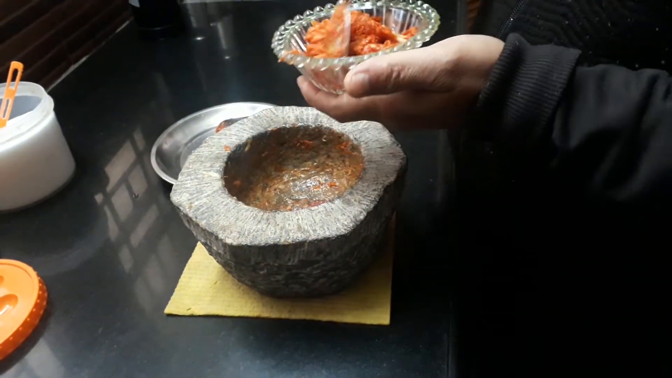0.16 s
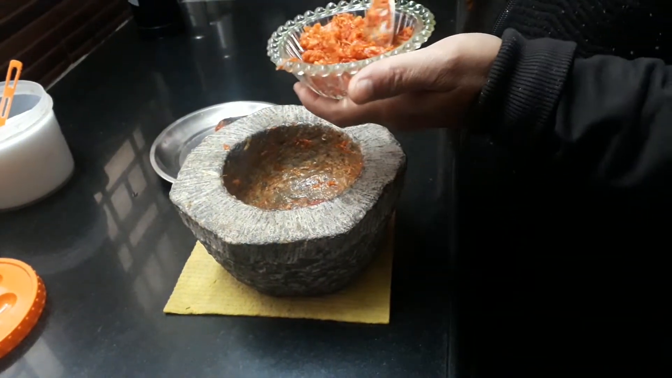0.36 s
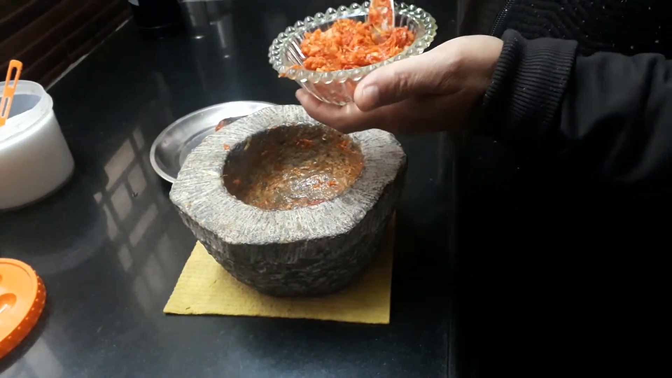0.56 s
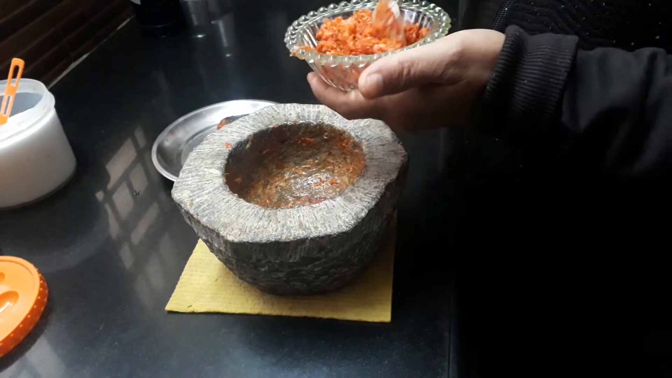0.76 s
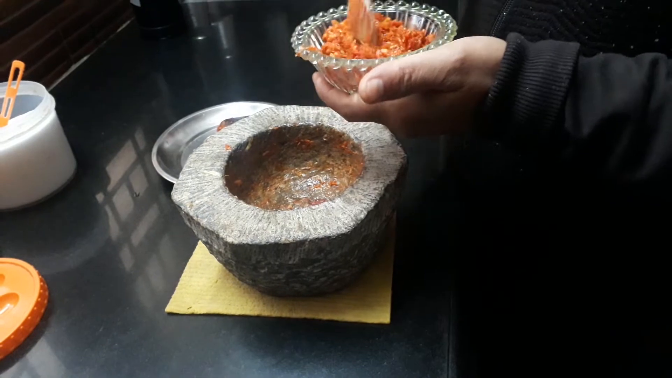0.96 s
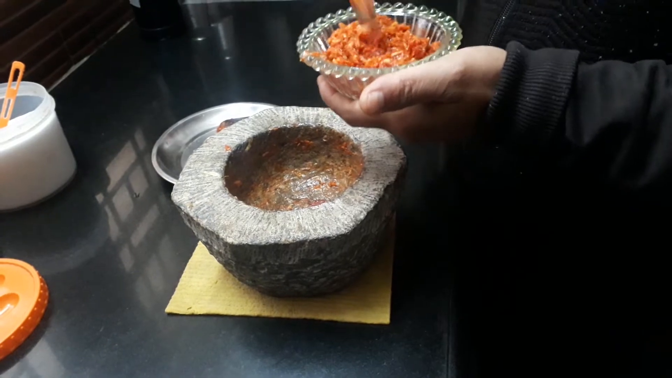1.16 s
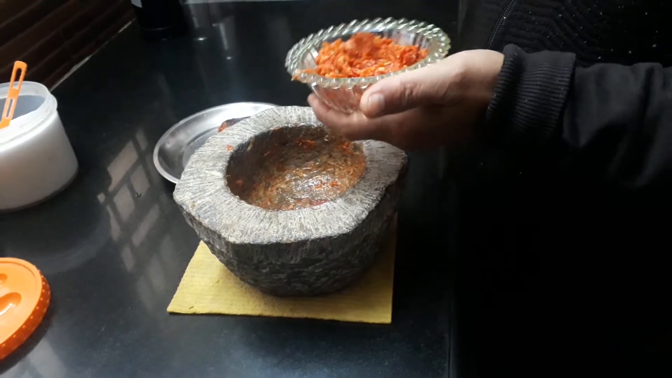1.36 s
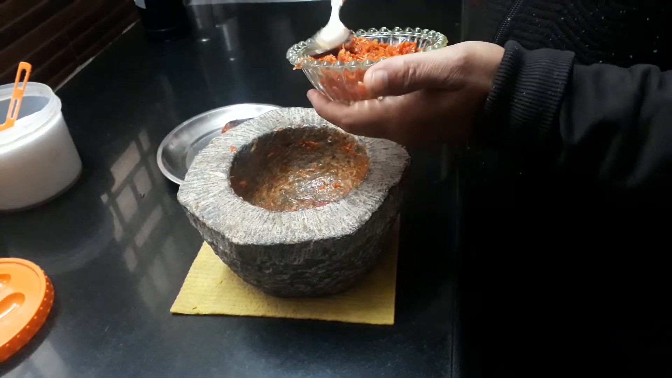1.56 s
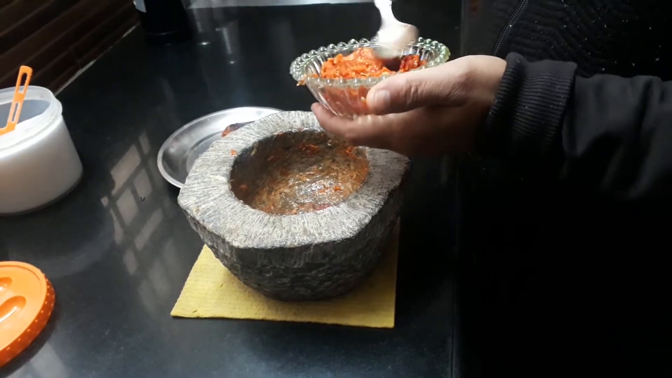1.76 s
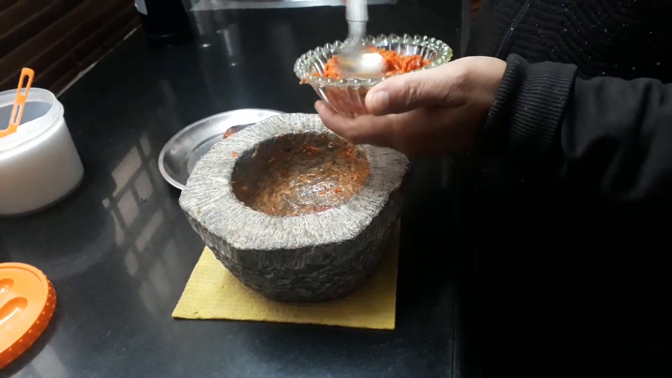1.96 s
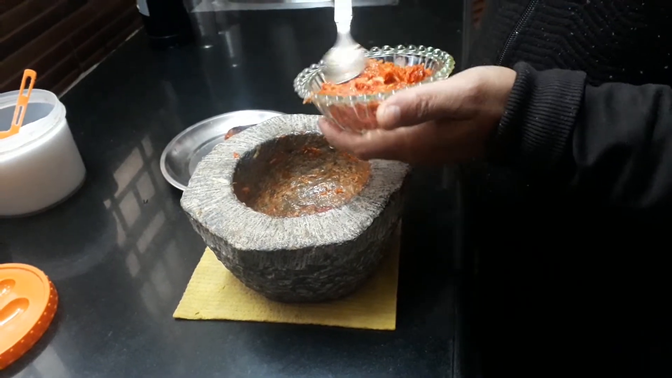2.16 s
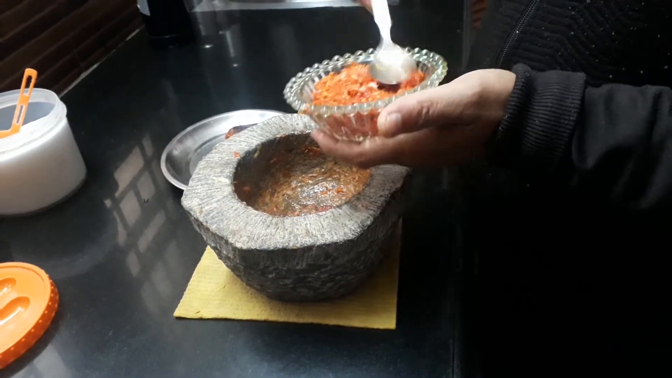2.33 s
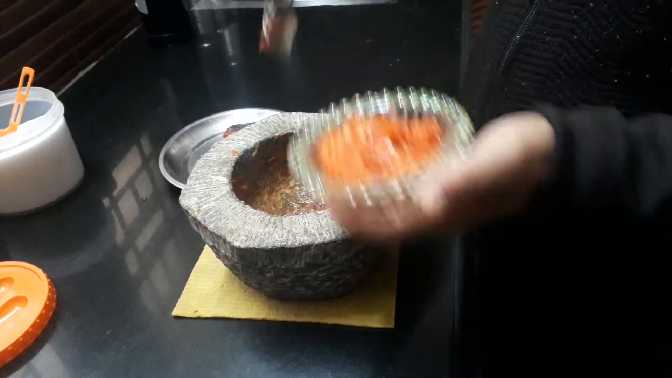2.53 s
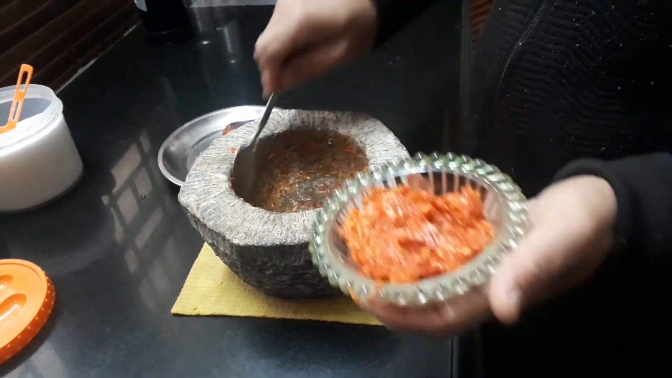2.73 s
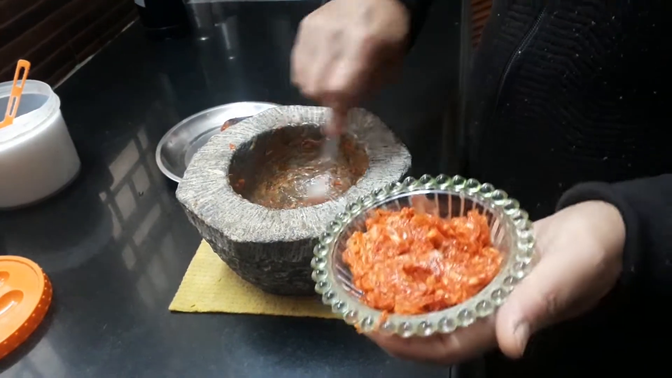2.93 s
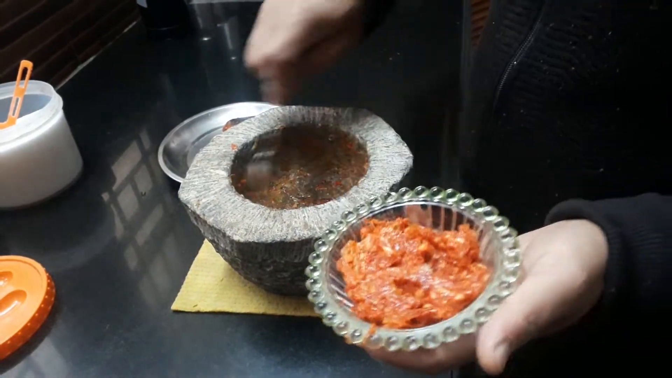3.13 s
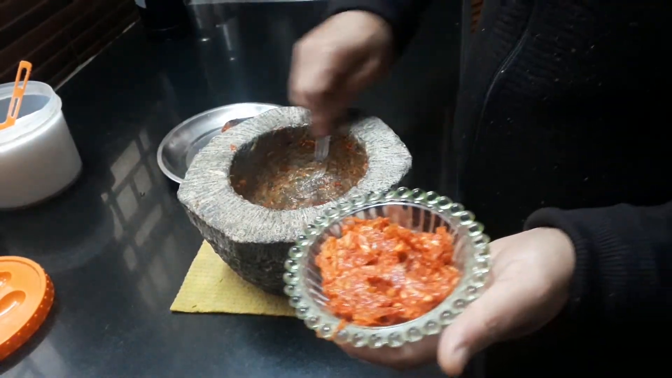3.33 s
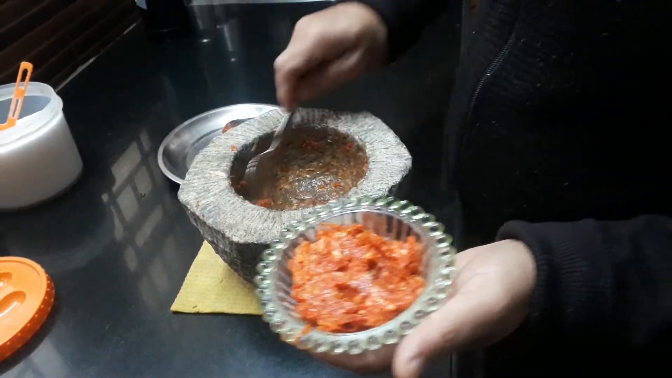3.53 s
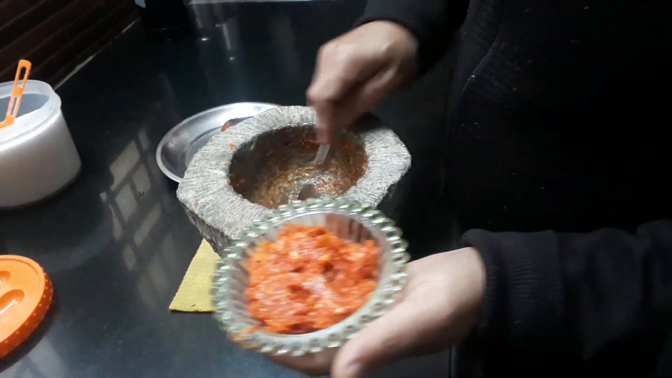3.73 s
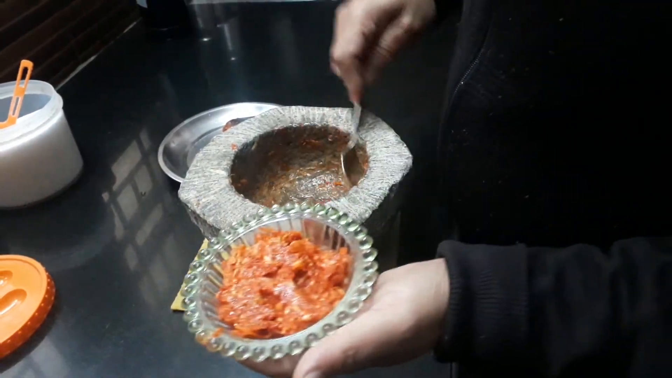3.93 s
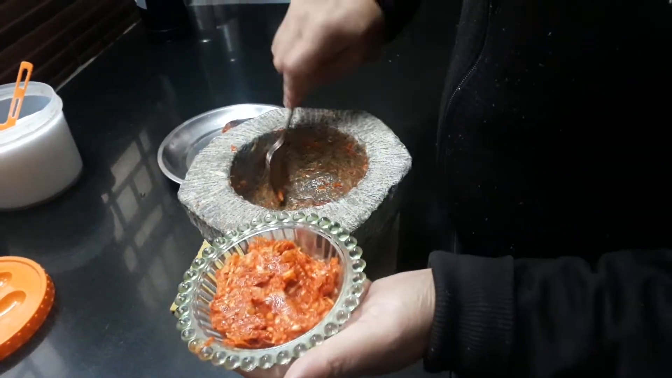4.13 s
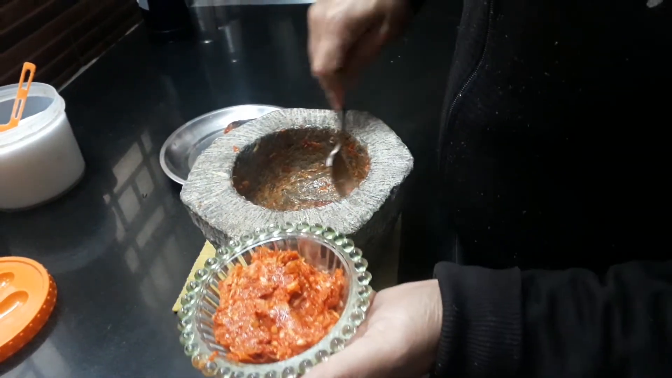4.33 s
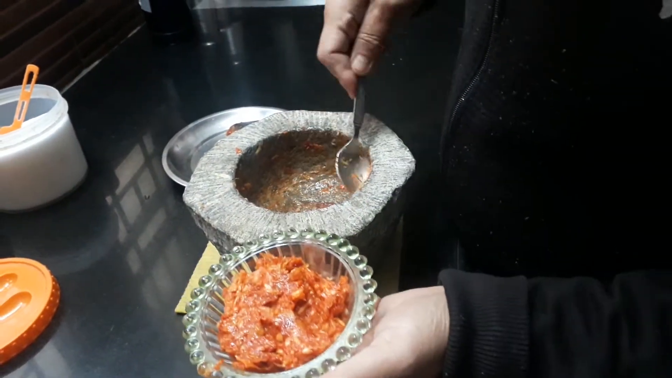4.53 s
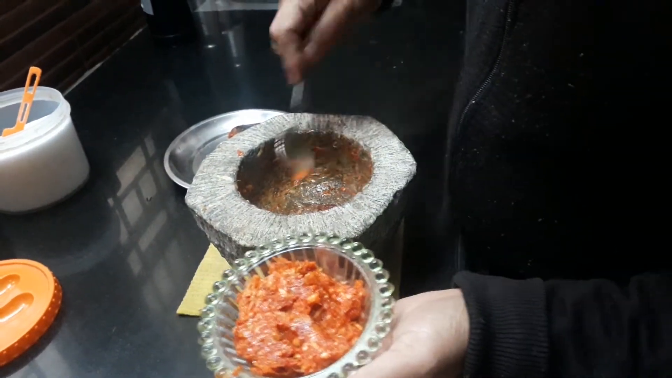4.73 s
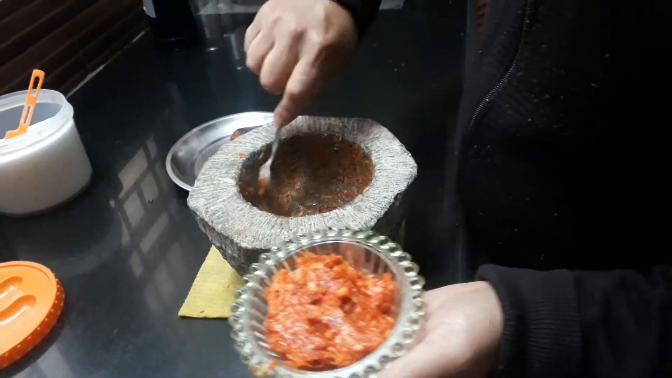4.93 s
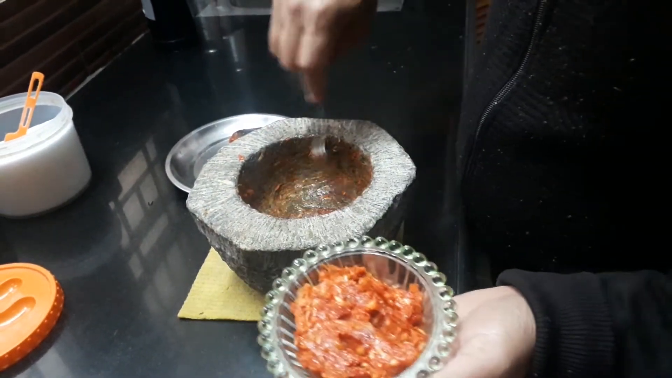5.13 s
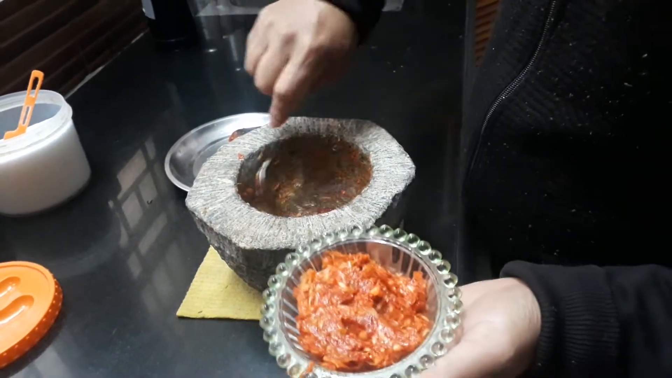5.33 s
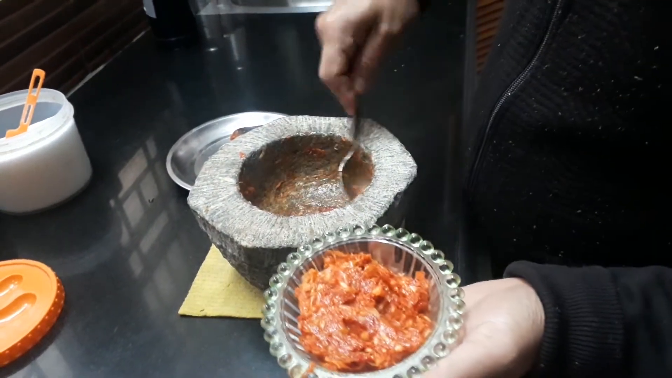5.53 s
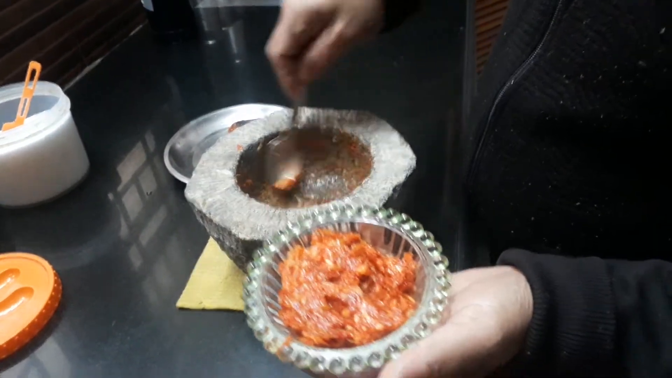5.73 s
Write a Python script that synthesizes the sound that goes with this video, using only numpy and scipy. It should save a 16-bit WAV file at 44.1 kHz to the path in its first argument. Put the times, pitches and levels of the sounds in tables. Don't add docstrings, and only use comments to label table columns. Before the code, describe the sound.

A steel spoon clinks on a hand-held glass bowl, then scrapes and knocks around a rough stone mortar while a pot simmers and hisses behind.

```python
import sys
import numpy as np
from scipy import signal
from scipy.fft import rfft, irfft
from scipy.io import wavfile
from scipy.ndimage import uniform_filter1d, map_coordinates

SR = 44100
rng = np.random.default_rng(int(sys.argv[2]) if len(sys.argv) > 2 else 0)


def amplitude_ratio(level_db):
    exponent = np.asarray(level_db, float) / 20
    return 10 ** exponent


def wav_record(signal):
    frames = np.transpose(np.atleast_2d(signal))
    bounded = np.clip(frames, -1, 1)
    quanta = np.round(bounded * 32767).astype(np.int16)
    wavfile.write(sys.argv[1], SR, quanta)


N = 259308

# (time [s], peak level [dB], colour [Hz], top level [dB])
CATCHES = [(2.7982, -20.5, 5440, -11), (2.8384, -20, 4570, -11), (2.867, -24, 4040, -14),
           (2.9095, -34, 4410, -7), (2.9172, -13, 4660, -11.5), (2.9263, -17, 4680, -15),
           (2.9574, -14.5, 4180, -27), (2.9606, -11, 4000, -33), (3.0187, -31, 4160, -27),
           (3.2065, -13, 6000, -7.5), (3.242, -26, 4600, -11), (3.3179, -13, 7440, -13),
           (3.327, -17.5, 4150, -13), (3.3445, -14.5, 3880, -11), (3.384, -22.5, 2940, -18),
           (3.4443, -18.5, 4340, -23), (3.5923, -12.5, 5900, -3.5), (3.6683, -23, 4150, -16),
           (3.6783, -19, 4160, -23), (3.69, -29, 7160, -1), (3.7037, -21, 4110, -18),
           (3.7361, -22, 3550, -13), (3.7496, -14, 4100, -12), (3.7547, -17, 5440, -11),
           (3.7831, -12, 2540, -23), (3.8066, -4.5, 3500, -19), (3.8148, -16, 3230, -19),
           (3.8272, -16, 3700, -26), (3.8333, -6.5, 3800, -31), (3.8496, -23, 3360, -25),
           (3.8597, -8, 3960, -19), (3.8681, -7, 4100, -26), (3.8817, -14, 3300, -29),
           (3.9173, -21, 4100, -12), (3.9346, -18, 4080, -6), (3.9556, -23, 4100, -13),
           (4.1122, -15.5, 5650, -11.5), (4.1837, -27, 4730, -11), (4.2475, -20, 3640, -15),
           (4.2518, -22.5, 5100, -15), (4.2788, -21, 3760, -20), (4.2994, -13.5, 4270, -27),
           (4.3302, -10, 4400, -11), (4.3611, -10, 3000, -29), (4.3855, -2.5, 4150, -20),
           (4.3933, -11, 4180, -23), (4.4035, -24, 3240, -28), (4.4209, -7, 4700, -27),
           (4.4244, -0.5, 4200, -19), (4.4392, -20, 3990, -28), (4.4665, -18, 3900, -18),
           (4.4872, -24, 4050, -25), (4.5054, -10, 4180, -21), (4.5082, -11, 5300, -15),
           (4.5256, -18, 4000, -27), (4.5831, -10, 4710, -17), (4.6027, -10, 5230, -16.5),
           (4.609, -22, 3260, -21), (4.8686, -8.5, 5970, -0.5), (4.95, -24, 3590, -12),
           (4.9762, -19, 4350, -16), (4.982, -28, 3260, -20), (5.0064, -14, 3380, -19),
           (5.042, -14, 4270, -18), (5.0662, -9.5, 3420, -24), (5.0698, -4.5, 4320, -32),
           (5.0857, -15, 4190, -32), (5.089, -8, 3730, -33), (5.0916, -6, 4950, -18.5),
           (5.0947, -19, 3320, -24), (5.1044, -23, 3460, -22), (5.107, -24, 3880, -29),
           (5.3004, -11.5, 6000, -3.5), (5.3307, -17.5, 4500, -21), (5.383, -22, 4870, -25),
           (5.425, -20.5, 4150, -10), (5.4496, -14.5, 5010, -17), (5.473, -13, 4200, -13),
           (5.4943, -14, 3470, -12), (5.501, -8.5, 3500, -17), (5.5056, -10.5, 3970, -25),
           (5.51, -14, 3180, -26), (5.5212, -12, 3330, -27), (5.5534, -8.5, 4900, -22),
           (5.5622, -10, 3360, -26), (5.5738, -12, 3770, -28), (5.5895, -8.5, 4670, -11),
           (5.599, -13, 4340, -22), (5.606, -12, 4500, -23), (5.615, -8.5, 4900, -14),
           (5.621, -5, 2920, -16), (5.781, -16, 4300, 3), (5.867, -36, 4030, -13)]
# (time [s], pressure [dB], low stone [dB], edge brightness [dB], hollow [dB])
STROKES = [(2.77, -54, -5, -10, -5), (2.79, -48, -13, 7, -21), (2.99, -42.5, 14.5, 5, 3.5),
           (3.18, -69, -10, -6, -18), (3.22, -45, 1, 11, -5), (3.28, -46.5, -1, 2, -9),
           (3.36, -49, 14, 12, 3), (3.57, -48, -8, -16, -25), (3.59, -57.5, -16, 10, 6),
           (3.62, -52.5, -5, 10.5, -1), (3.83, -34.5, 12.5, 5, -15.5), (4.1, -58.5, -10, -23, 0),
           (4.11, -52, -4, 4, -1), (4.22, -45, -1, -9, -16), (4.29, -41, 7.5, 8, -6),
           (4.47, -32.5, 2, -2, -12.5), (4.63, -46.5, 7, -5, 4), (4.86, -66, -10, -10, -19),
           (4.87, -53.5, 12, 3, 3), (4.95, -42.5, -7, -4, -8), (5.08, -35.5, 12, 1, -8),
           (5.29, -63, -10, -14, -35), (5.3, -49.5, -5, -8, 3.5), (5.38, -34, -15.5, -7, -21),
           (5.5, -28.5, -1, 3, -14.5), (5.54, -34, 10, -8, -20), (5.61, -36, 5, 18.5, -3.5),
           (5.72, -59, -17, -2, -15), (5.88, -45, -47, -15, -17)]
# (frequency [Hz], width [Hz], level [dB])
STONE = [(3510, 130, 9), (3800, 170, 8.5), (4120, 770, 13.5), (4630, 200, 12), (5710, 1600, 18)]
# (frequency [Hz], width [Hz], level [dB])
STONE_LOW = [(1950, 300, -1), (2250, 300, 0), (2550, 350, -4)]
# (frequency [Hz], width [Hz], level [dB])
EDGE = [(6790, 300, -3.5), (8070, 360, 6.5), (9090, 890, -3.5), (10000, 4500, -8.5)]
# (frequency [Hz], width [Hz], level [dB])
HOLLOW = [(858, 80, 3.5), (974, 51, 7.5), (1620, 880, 13.5), (465, 140, -39)]
SPOON_HZ = [2320, 4150, 4545, 4950, 5800, 7750, 10800, 14600]
# (level [dB], t60 [s])
SPOON_RING = [(-10, .04), (-8, .03), (-8, .04), (-8, .04), (-6, .03), (-10, .03), (-9, .03), (-3, .012)]
# (time [s], spoon bowl ring [dB], neck ring [dB])
SINGING = [(2.77, -69, -77), (2.79, -57, -42), (2.98, -30, -25.5), (3.15, -61, -78), (3.3, -61, -71),
           (3.33, -41, -50), (3.39, -35, -48), (3.57, -67, -64), (3.83, -25, -34), (3.86, -30.5, -38),
           (4.07, -61, -74), (4.11, -51, -50), (4.21, -49, -67), (4.35, -28, -45), (4.39, -26.5, -32),
           (4.56, -47, -60), (4.61, -35, -28), (4.64, -51, -58), (4.83, -71, -84), (4.87, -52, -47),
           (4.93, -52, -50), (5.08, -18.5, -35), (5.26, -85, -68), (5.31, -53, -66), (5.37, -48, -53),
           (5.43, -38, -50), (5.51, -21, -32), (5.61, -41, -32), (5.76, -68, -72), (5.78, -54, -59),
           (5.88, -77, -62)]
# (frequency [Hz], width [Hz], level [dB])
SPOON_BOWL = [(3195, 45, 0), (3325, 35, -4), (3070, 40, -9)]
# (frequency [Hz], width [Hz], level [dB])
SPOON_NECK = [(4790, 14, 0)]
# (time [s], peak level [dB], low cluster [dB], low tone [dB], top ring [dB])
CLINKS = [
    (0.174, -15.5, -12, -32, -20),
    (1.945, -13.5, -11, -35, -15.5),
    (2.0935, -29.5, -14, -9, -19),
    (2.1462, -25.5, -11, -3, -19),
]
# (frequency [Hz], level [dB], t60 [s])
GLASS = [(1840, -4, .03), (2330, -2, .16), (2200, -4, .02), (2480, -3, .03), (2700, 0, .025),
         (2830, -5, .06), (3050, -2, .02), (3500, -3, .015), (4200, -13, .012), (4985, -13, .02),
         (5260, -3, .03), (5340, -6, .045), (5430, -2, .04), (5520, -5, .045), (5600, -4, .045),
         (5680, -2, .055), (5800, -7, .03), (6100, -11, .03), (6600, -9, .02), (7550, -13, .02),
         (9000, -6, .03), (10150, 0, .02), (10500, 0, .02), (11400, -5, .015), (12280, -3, .05),
         (13500, -3, .03), (15200, -1, .015)]
# (time [s], peak level [dB], upper ring [dB])
THUDS = [(0.023, -36.5, -11.5), (0.103, -32.5, -12), (0.24, -44, -20), (0.327, -36, -12),
         (0.48, -37.5, -12), (0.544, -35.5, -22), (0.604, -55, -13), (0.677, -36, -5.5), (0.794, -37, -13),
         (0.908, -41.5, -0.5), (0.944, -32.5, -20), (1.101, -33.5, -13), (1.217, -47, -6),
         (1.525, -38, -13), (1.611, -35, -12), (1.662, -35.5, -14), (1.7, -38, -28), (1.809, -36, -14),
         (1.863, -55, -20), (2.179, -30, -19), (2.328, -56, -22), (2.409, -47, -2), (2.446, -34, -11),
         (2.582, -34, -11), (2.644, -42, -19), (2.7, -32, -10), (2.756, -39, -20), (2.856, -39, -19),
         (2.895, -39, -18), (2.949, -28.5, -14), (3.025, -33.5, -11), (3.202, -36, -18), (3.372, -33, -10),
         (3.489, -44, -14), (3.551, -34, -17), (3.609, -38.5, -17), (3.711, -39, -7), (3.748, -32, -5),
         (3.852, -32.5, -18), (3.894, -36.5, -17), (3.967, -38.5, -17), (4.072, -36, -18),
         (4.119, -56, -15), (4.208, -40.5, -9), (4.298, -40.5, 5), (4.334, -30.5, -8), (4.39, -35, -14),
         (4.472, -32, -5), (4.598, -48, 19), (4.67, -34.5, -26), (4.818, -39, -12), (4.905, -32, -15),
         (5.111, -39, -11), (5.451, -47, 11), (5.504, -38, -1), (5.817, -37, -15)]
# (frequency [Hz], level [dB], t60 [s])
POT = [(176, -6.5, 0.16), (218, -6, 0.14), (258, 6.5, 0.052), (292, -1.5, .16), (311.8, 1.5, 0.17),
       (367, -4, 0.054), (378.7, -3.5, 0.15), (443, -13.5, 0.19), (542, -17, 0.12), (768, 1.5, 0.068),
       (850, 0, 0.11), (907, -2.5, 0.15)]
# (frequency [Hz], level per Hz [dB])
HISS = [(590, -51), (1000, -28), (1220, -13), (1340, -11), (1560, -9.5), (1690, -7.5), (2080, -3),
        (2260, -8), (2450, -7), (2850, -11), (5880, -12.5), (7080, 0), (9820, -19), (13400, -11),
        (16200, -23.5)]
# (frequency [Hz], level per Hz [dB])
RUMBLE = [(18, -48), (30, -38.5), (43, -9.5), (108, -11.5), (299, -1), (366, -8.5), (563, -9), (657, -19),
          (829, -15), (1200, -17.5), (1560, -35), (2640, -120)]
# (frequency [Hz], t60 [s], level [dB])
KITCHEN = [(400, .4, -2), (1500, .4, 0), (3000, .42, 0), (6000, .44, 0), (9000, .3, -2), (13000, .2, -5)]
# (delay [s], level [dB])
COUNTER_ECHO = (.0075, -17.5)


def rms_one(x):
    return x / np.sqrt(np.mean(x ** 2) + 1e-20)


def at_hz(points, hz, axis=1):
    table = np.array(points)
    return np.interp(np.log(hz), np.log(table[:, 0]), table[:, axis])


def in_time(rows):
    s, *columns = np.transpose(rows)
    return [np.interp(np.arange(N) / SR, s, column, left=-120) for column in columns]


def drift(rate_hz):
    knots = rng.standard_normal(4000)
    return map_coordinates(knots, [np.arange(N) * rate_hz / SR], order=2, prefilter=False) * 1.35


def band(x, low_hz, high_hz, order=4):
    return signal.sosfilt(signal.butter(order, [low_hz, high_hz], "band", fs=SR, output="sos"), x)


def train(rows, db):
    clicks = np.zeros(N)
    np.add.at(clicks, (np.array(rows)[:, 0] * SR).astype(int), amplitude_ratio(db))
    return clicks


def ring(clicks, hz, t60):
    r = amplitude_ratio(-60 / (t60 * SR))
    w = 2 * np.pi * hz / SR
    return signal.lfilter([0, np.sin(w)], [1, -2 * r * np.cos(w), r * r], clicks + 1e-18)


def body(x, resonances):
    return sum((-1) ** k * amplitude_ratio(db) * np.sqrt(width_hz) * ring(x, hz, 2.83 / width_hz)
               for k, (hz, width_hz, db) in enumerate(resonances))


def rubbed(grains, gain_db, resonances):
    out = 0
    for k, mode in enumerate(resonances):
        out = out + (-1) ** k * body(grains * amplitude_ratio(gain_db + 2.7 * drift(30)), [mode])
    return out / np.std(body(grains, resonances))


def coloured(spectrum, patchy_db, rate_hz):
    hz = np.maximum(np.arange(N // 2 + 1) * SR / N, 1)
    whole = rfft(rng.standard_normal(N)) * amplitude_ratio(at_hz(spectrum, hz))
    group = np.round(2 * np.log2(hz)) % 4
    out = 0
    for k in range(4):
        out = out + irfft(whole * (group == k), N) * amplitude_ratio(patchy_db * drift(rate_hz))
    return rms_one(out)


def grit():
    sizes = amplitude_ratio(4 * np.minimum(rng.exponential(1, N), 4)) * rng.choice([-1, 1], N)
    slips = rng.random(N) < 1500 / SR
    return rms_one(sizes * slips * amplitude_ratio(3.5 * drift(150)))


def scrape(grains):
    pressure_db, low_db, edge_db, hollow_db = in_time(STROKES)
    spoon = [(hz, 2.2 / t60, db) for hz, (db, t60) in zip(SPOON_HZ, SPOON_RING)]
    bright = rubbed(grains, pressure_db - 14, STONE)
    bright = bright + rubbed(grains, pressure_db - 19, spoon)
    bright = bright + rubbed(grains, pressure_db + low_db - 5.5, STONE_LOW)
    bright = bright + rubbed(grains, pressure_db + edge_db - 7.5, EDGE)
    breath = rng.standard_normal(N) + 0.63 * grains
    hollow = rubbed(breath, pressure_db + hollow_db - 2, HOLLOW)
    return band(bright, 1650, 12500, order=2), band(hollow, 350, 1880, order=2)


def catches():
    s, peak_db, colour_hz, top_db = np.transpose(CATCHES)
    top_db = np.minimum(top_db, np.where(colour_hz > 5300, 3, -12))
    heavy_db = -.6 * np.clip(top_db + 14, 0, 20)
    length = 600
    t = np.arange(length) / SR
    out = np.zeros(N + length)
    noise = rng.standard_normal((len(s), 2, length))
    for k in range(len(s)):
        narrow = ring(noise[k, 0] * amplitude_ratio(-60 * t / 0.0069), colour_hz[k], 13 / colour_hz[k])
        knock = ring(narrow, colour_hz[k], 4 / colour_hz[k])
        thud = body(noise[k, 1] * amplitude_ratio(-60 * t / 0.0033), STONE + STONE_LOW + EDGE)
        crack = band(noise[k, 1] * amplitude_ratio(-60 * t / .014), 8300, 12300, order=3)
        start = int(s[k] * SR)
        for part, db in [(knock, -3), (thud, heavy_db[k] - 10), (crack, top_db[k] - 3)]:
            out[start:start + length] += amplitude_ratio(peak_db[k] + db) * part / np.max(np.abs(part))
    out = out[:N]
    luck_db = rng.normal(0, 4, (len(s), len(SPOON_RING)))
    for k, (hz, (db, t60)) in enumerate(zip(SPOON_HZ, SPOON_RING)):
        region_db = heavy_db - 17 if hz < 5500 else -17 if hz < 9000 else top_db - 10
        clicks = train(CATCHES, peak_db + region_db + db + luck_db[:, k])
        out = out + ring(clicks, hz, np.clip(t60, .005, .05))
    return out


def singing(grains):
    out = 0
    for db, modes in zip(in_time(SINGING), (SPOON_BOWL, SPOON_NECK)):
        tone = rms_one(body(grains, modes))
        steady = tone / np.sqrt(0.25 + uniform_filter1d(tone ** 2, size=1500))
        out = out + amplitude_ratio(db - 5.5 + 4.1 * drift(90)) * steady
    return out


def clinks():
    s, peak_db, low_db, tone_db, top_db = np.transpose(CLINKS)
    luck_db = rng.normal(0, 1.8, (len(s), len(GLASS)))
    out = 0
    for k, (hz, db, t60) in enumerate(GLASS):
        if k == 1:
            region_db = tone_db
        elif hz < 4000:
            region_db = low_db + 4
        else:
            region_db = top_db if hz > 8500 else 0
        clicks = train(CLINKS, peak_db + db + region_db - 5 + luck_db[:, k])
        out = out + (-1) ** (k // 4) * ring(clicks, hz, t60)
    return np.roll(out, -45)


def pot():
    s, peak_db, upper_db = np.transpose(THUDS)
    luck_db = rng.normal(0, 2, (len(s), len(POT)))
    rough = rng.standard_normal(N)
    out = 0
    for k, (hz, db, t60) in enumerate(POT):
        region_db = upper_db if hz > 700 else 0
        push = train(THUDS, peak_db + db - 7.5 + luck_db[:, k] + region_db)
        tail = signal.lfilter([.04], [1, -amplitude_ratio(-60 / (.05 * SR))], push) * rough
        out = out + (-1) ** k * ring(push + tail, hz, t60)
    return band(out, 140, 1100, order=2)


def steam():
    return amplitude_ratio(-45.5) * coloured(HISS, patchy_db=0.1, rate_hz=5)


def rumble():
    return amplitude_ratio(-51) * band(coloured(RUMBLE, patchy_db=1.5, rate_hz=7), 62, 3000)


def kitchen(x):
    t = np.arange(SR // 2) / SR
    edges = 100 * 2. ** np.arange(0, 7.6, .5)
    tail = 0
    for low, high in zip(edges, edges[1:]):
        hz = np.sqrt(low * high)
        noise = band(rng.standard_normal(len(t)), low, high, order=2)
        tail = tail + noise * amplitude_ratio(at_hz(KITCHEN, hz, axis=2) - 60 * t / at_hz(KITCHEN, hz))
    tail = tail * np.clip(t / 0.0015, 0, 1) ** 2
    return signal.fftconvolve(x, tail / np.sqrt(np.sum(tail ** 2)))[:N]


def scene():
    grains = grit()
    bright, hollow = scrape(grains)
    near = band(clinks() + catches() + bright, 1790, 13000) + hollow + singing(grains)
    delay_s, echo_db = COUNTER_ECHO
    near = near + amplitude_ratio(echo_db) * np.roll(near, int(delay_s * SR))
    far = pot()
    room = kitchen(amplitude_ratio(-6.5) * near + amplitude_ratio(-3.5) * far)
    return (near + amplitude_ratio(-2.5) * far + room + steam() + rumble())[None]


def band_limit(x):
    return signal.sosfilt(signal.butter(12, 16470, fs=SR, output="sos"), x)


def record(dry):
    rounded = 1.62 * np.tanh(dry / 1.391)
    top_cut = signal.ellip(10, .5, 40, 15720, fs=SR, output="sos")
    mix = signal.sosfilt(top_cut, rounded)
    return band_limit(mix)


dry = scene()
out = record(dry)
wav_record(out)
```